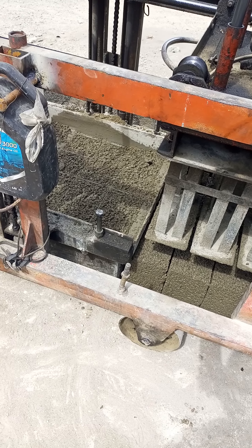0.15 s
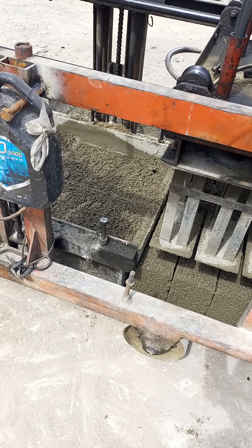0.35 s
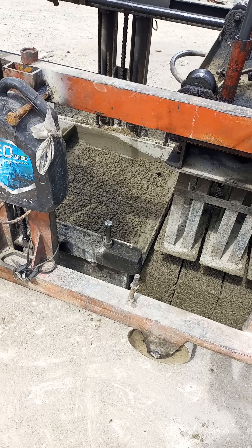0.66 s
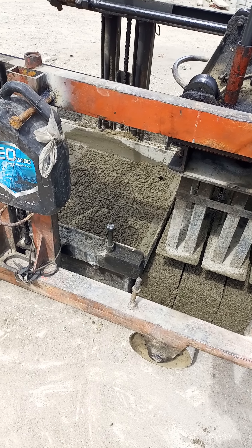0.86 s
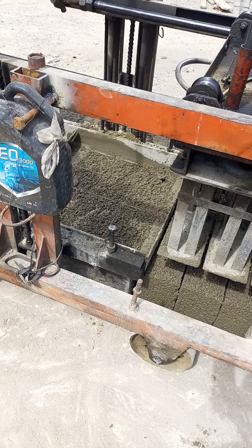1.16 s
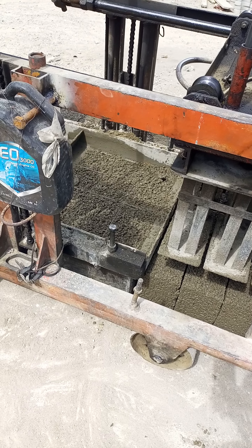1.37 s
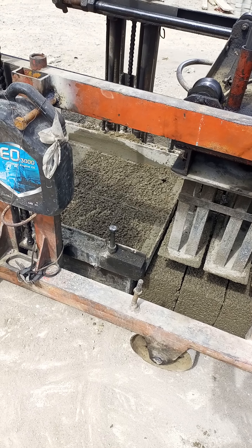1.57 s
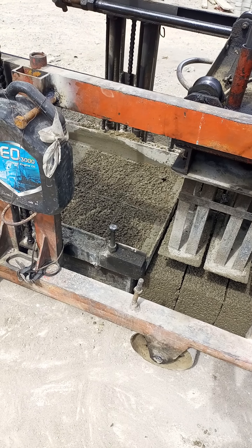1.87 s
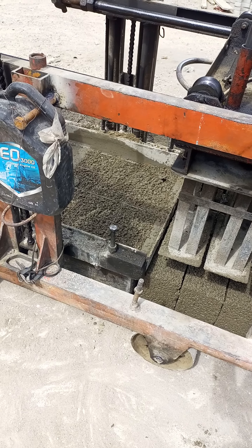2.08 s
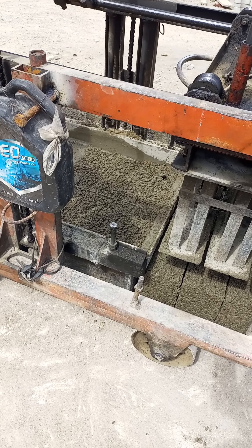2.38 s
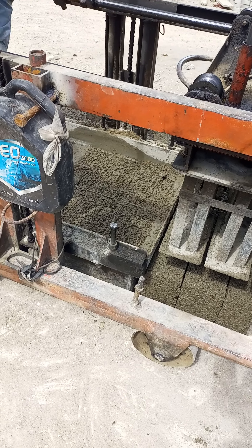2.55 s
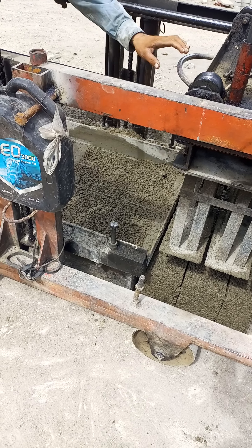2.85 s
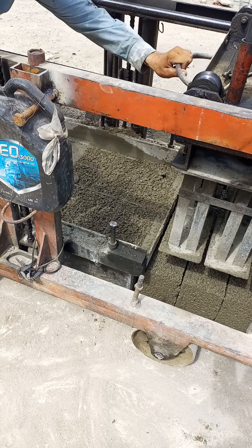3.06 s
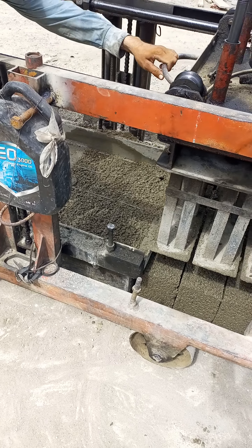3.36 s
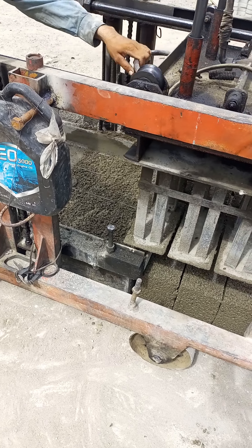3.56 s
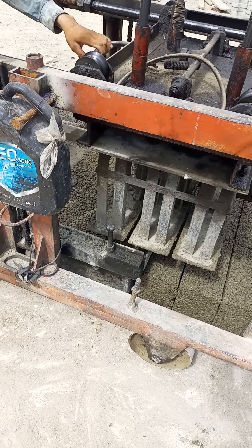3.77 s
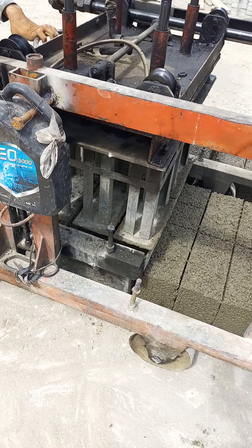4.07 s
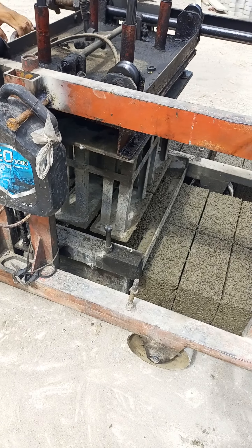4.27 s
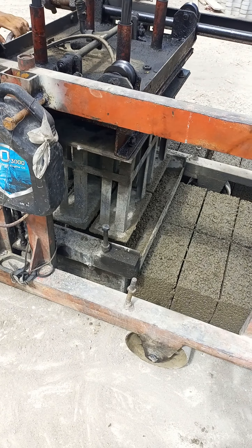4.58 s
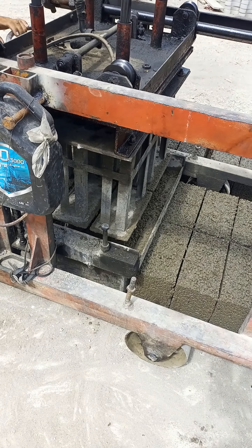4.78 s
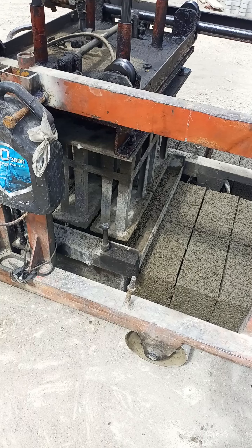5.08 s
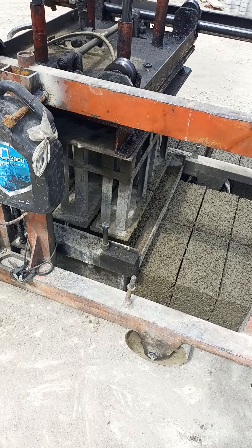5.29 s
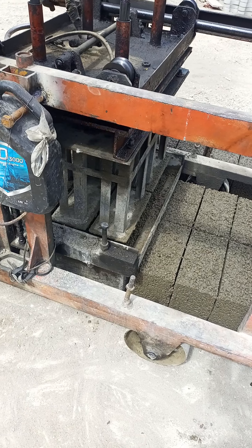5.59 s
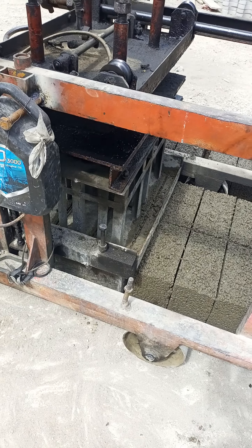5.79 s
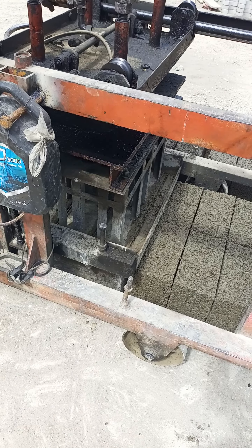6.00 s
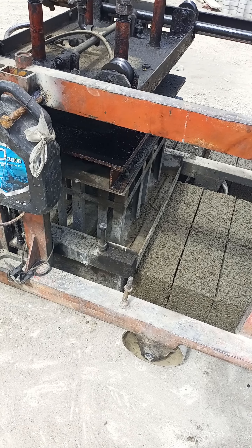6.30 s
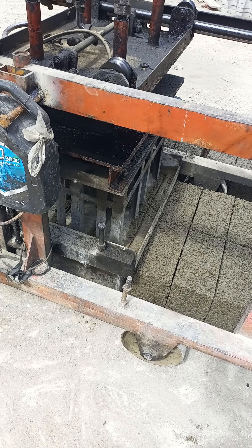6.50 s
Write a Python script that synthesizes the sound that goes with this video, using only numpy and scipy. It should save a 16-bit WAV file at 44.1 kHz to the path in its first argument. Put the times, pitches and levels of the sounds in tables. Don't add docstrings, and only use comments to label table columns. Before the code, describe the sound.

Outdoors, close to a block-making machine, a one-cylinder engine chugs slowly with ticking valves and loose covers. A shovel knocks and scrapes through wet, gritty mix against a steel mould, in scattered bursts with small clinks. After a pause of plain idling come a few more sharp knocks, then the engine picks up in quick cracks and the whole frame breaks into a dense, loud rattle with a low boom, still climbing at the end.

```python
import sys
import numpy as np
from scipy import signal
from scipy.io import wavfile
from scipy.ndimage import uniform_filter1d

SR = 44100
rng = np.random.default_rng(int(sys.argv[2]) if len(sys.argv) > 2 else 0)


def pcm_store(signal):
    levels = np.round(np.clip(np.atleast_2d(signal), -1, 1) * 32767)
    wavfile.write(sys.argv[1], SR, levels.astype(np.int16).T)


def elevation(decibels):
    levels = np.asarray(decibels, float)
    return 10 ** (levels / 20)


N = 292824
T = np.arange(N) / SR
THROTTLE_S = 4.82

# [t/s, firings per s]
SPEED = [(0, 11.6), (.8, 11.92), (1.4, 12.), (2.1, 11.46), (3., 11.82), (3.9, 11.79), (4.8, 11.63),
         (4.95, 16.52), (5.2, 18.65), (5.5, 23.07), (5.8, 25.62), (6.1, 31.36), (6.4, 36.22), (6.66, 41.6)]
# [t/s, level/dB]
LOAD = [
    (4.82, -33),
    (4.92, -42),
    (5.2, -33),
    (5.42, -24.5),
    (5.72, -22),
    (5.755, -19.5),
    (5.88, -23),
    (6.1, -23.5),
    (6.47, -20),
]
# [f/Hz, level/dB, t60/s, lag/s]
PIPE = [
    (105, 1.5, 0.11, 0.0051),
    (133, 1.5, 0.1, 0.0042),
    (229, 1.5, 0.058, 0.0005),
]
# [middle t/s, length/s, level/dB]
CHARGE = [(.25, .08, 4), (.33, .08, -8), (.63, .17, 1.5), (1.1, .08, 1), (1.18, .08, 6), (1.9, .17, 6),
          (2.46, .08, 10.5), (2.63, .25, 6.5), (2.92, .17, 2), (3.23, .25, 5.5), (3.65, .08, -10),
          (3.78, .17, 6), (3.91, .08, 3.5), (4.07, .25, -4), (5.04, .05, 8), (5.095, .05, 3.5),
          (5.15, .05, 1)]
# [share of cycle, level/dB, f/Hz, t60/s]
SLAPS = [(.40, -36.5, 2570, .11), (.47, -39, 2530, .09), (.02, -40, 2200, .05), (.03, -43, 3580, .06),
         (.60, -45, 1350, .08), (.40, -44, 4270, .05), (.3, -46, 5200, .04), (.33, -42, 3330, .05)]
# [share of cycle, level/dB]
STROKE = [(0, -8), (.03, 0), (.1, -1), (.22, -4.5), (.34, -1), (.46, -.5), (.56, -4), (.62, -3.5),
          (.72, -9), (.82, -12), (1, -10)]
# [f/Hz, level/dB per Hz]
CASING = [(150, -5.5), (250, -17.5), (324, -22), (555, -11.5), (828, -19), (1150, -9), (1740, -9.5),
          (2560, -0.5), (2740, -5.5), (3810, -10), (4300, -10.5), (7240, -25.5), (9300, -17), (10500, -13),
          (10950, -24.5), (13500, -27.5), (15800, -22.5)]
# [f/Hz, width/Hz, level/dB]
COVER_MODES = [(1105, 15, -51), (1405, 56, -9.5), (1444, 46, -7.5), (2117, 15, -4.5), (2274, 33, -3.5),
               (2646, 73, -12), (2690, 93, -14), (3150, 35, -8), (3390, 56, -5.5), (3583, 25, -6),
               (4310, 45, -6), (4600, 71, -13), (4650, 28, -13), (5230, 46, -12), (5450, 48, -20),
               (5940, 61, -16)]
# [f/Hz, level/dB per Hz]
YARD = [(20, -2), (60, -5), (110, -3), (160, -6), (250, -9), (330, -11), (550, -5), (780, -11), (1300, -7),
        (2500, -40)]
# [t/s, level/dB, f/Hz, t60/s]
RINGS = [(.15, -38, 412, 0.064), (0.539, -18, 980, 0.039), (0.543, -25, 453, 0.042), (.7, -44, 805, 0.45),
         (1.29, -43, 525, 0.19), (1.385, -39.5, 818, 0.2), (1.432, -36.5, 805, 0.21),
         (.539, -20, 2380, .05), (.79, -23.5, 226, 0.25), (.72, -40.5, 440, .3), (.85, -35, 480, .3),
         (5.19, -25, 232, .08), (4.357, -25, 4150, .1), (5.995, -27, 550, .5), (6.26, -29, 560, 0.7),
         (1.593, -20, 569, 0.12), (1.604, -41.5, 430, 2.1), (2.61, -39.5, 431, 4.7),
         (2.61, -19.5, 570, 0.074), (2.743, -43.5, 437, 0.47), (2.745, -33.5, 540, 0.19),
         (2.894, -31.5, 570, 0.066), (2.899, -46.5, 436, 3), (2.221, -32.5, 101, 0.54),
         (4.302, -21.5, 238.2, 0.24), (4.59, -47.5, 1600, 0.37), (5.04, -40, 444, 0.28),
         (5.105, -43, 440, 0.22), (5.15, -40, 570, 0.1), (5.265, -33, 403, .2), (4.845, -35, 2200, .08),
         (4.865, -32, 2600, .1), (4.855, -37, 5200, .08), (4.965, -33, 2150, .07), (4.99, -34, 3350, .08),
         (5.02, -37, 5950, .1), (5.12, -36, 1350, .15), (5.17, -33, 1400, .1), (2.405, -35, 2600, .08),
         (3.345, -42, 4750, .12), (1.7, -39, 4300, .1), (5.755, -17, 690, 0.13), (5.754, -28, 236, 0.34)]
# [t/s, level at 2.4 kHz/dB, weight/dB, breadth/dB, t60/s]
KNOCKS = [(0.539, -10, -14.5, -11, 0.061), (0.5551, -22.5, 0.5, 3.5, 0.066),
          (0.7894, -20.5, -33, -18, 0.08), (1.2209, -28, -15, 7, 0.058), (1.8825, -13.5, -10, -30, 0.14),
          (1.9078, -5, -13, -3.5, 0.047), (2.2069, -34.5, 22.5, 2, 0.24), (2.2498, -43.5, -6, 28, 0.14),
          (2.297, -20.5, -8, 2, 0.11), (2.3182, -17.5, -21, 1, 0.083), (2.6075, -17.5, -26, -2, 0.061),
          (2.743, -20.5, -11, -13.5, 0.15), (2.8897, -17, -40, -42, 0.14), (2.9194, -31, -13, -7, 0.052),
          (4.3006, -14, -32, -10, 0.12), (4.3289, -12.5, -43, -5.5, 0.084), (4.357, -18.5, -31, -2, 0.27),
          (4.428, -12.5, -48, -9, 0.093), (4.83, -26.5, -44, -14, 0.13), (5.7584, -4, -6.5, -29, 0.074)]
BLADE_HZ = [345, 560, 680, 790, 877, 1030, 1168, 1280, 1480, 1626, 1740, 1960, 2150, 2260, 2400, 2580, 2724,
            2955, 3060, 3320, 3620, 4320, 4600, 4926, 5286, 5920, 6340, 7120]
# [start t/s, length/s, gravel on mould/dB, drag of blade/dB, grit/dB]
SCRAPES = [(0.693, 0.14, -55, -44.5, -45), (0.78, 0.085, -32.5, -41, -37), (0.81, 0.061, -31, -33.5, -54),
           (0.846, 0.11, -49, -45, -51), (1.22, 0.12, -50, -42, -38), (1.494, 0.11, -33.5, -39.5, -41),
           (1.553, 0.073, -37.5, -33.5, -45), (1.875, 0.045, -52, -25, -25.5),
           (1.913, 0.12, -54, -34.5, -33), (2.195, 0.16, -26, -29, -42), (2.251, 0.073, -25.5, -27.5, -33),
           (2.296, 0.13, -32.5, -29.5, -33.5), (2.395, 0.097, -42, -57, -60), (2.6, 0.13, -44, -37.5, -42),
           (4.261, .04, -60, -56, -39), (4.281, 0.16, -35.5, -32, -22.5), (4.421, 0.06, -38, -36, -32.5)]
# [low f/Hz, high f/Hz]
STROKE_BANDS = [
    (130, 345),
    (350, 926),
    (1500, 3550),
    (4000, 7140),
]
# [f/Hz, level/dB per Hz]
SPRAY = [(7000, -52), (8500, 9), (10200, 10), (13000, -8), (15600, 9), (16000, -20)]
# [start t/s, length/s, level/dB]
THROWS = [
    (0.783, 0.024, -31.5),
    (2.197, 0.063, -33.5),
    (2.24, 0.031, -32.5),
    (2.29, 0.046, -25),
    (4.822, 0.025, -37),
]
# [f/Hz, level/dB, t60/s]
EDGE = [(364, -12, 0.16), (800, -13, 0.14), (1273, -13, 0.11), (1487, 8, 0.028), (1600, -13, 0.063),
        (2140, 4.5, 0.037), (2260, -9, .08), (2474, 1, 0.057), (4040, -10, 0.065), (4860, -4, 0.073),
        (5210, 13.5, 0.021), (4970, -4, 0.14), (6300, -7, 0.05)]
# [f/Hz, level/dB, t60/s]
RIM = [(880, -13.5, 0.27), (1360, -23, 0.35), (1540, -14, 0.38), (2054, -9, 0.23), (2240, -8, 0.1),
       (2680, 10.5, 0.042), (3070, -4, 0.077), (3650, -10, 0.083), (4160, -2.5, 0.037), (4320, -2, 0.06),
       (5300, -11, 0.063), (5700, -11, 0.042), (5860, -29, .12)]
# [t/s, level/dB]
EDGE_HITS = [
    (1.221, -24),
    (1.879, -43),
]
# [t/s, level/dB]
RIM_HITS = [
    (2.608, -21),
    (2.616, -24),
    (2.741, -25),
    (2.891, -37),
    (2.92, -38),
]
# [delay/s, level/dB]
ECHOES = [(.0031, -19), (.0074, -17), (0.012, -14), (0.021, -40), (.034, -17.5)]
# [f/Hz, level/dB per Hz]
RATTLE = [(600, -41), (1200, -42), (1630, -32), (1900, -8), (2600, -6), (3200, -2), (3700, 0), (4200, 1.5),
          (5400, 0.5), (6200, 3), (7600, -7), (9800, -15.5), (12300, -20), (13600, -23), (15700, -3)]
# [f/Hz, width/Hz, level/dB]
FRAME_MODES = [(1155, 60, -9), (1260, 70, -9), (1875, 50, -4), (2058, 60, -6), (2209, 60, -5),
               (2430, 60, -4), (2559, 55, -1), (2665, 55, -3), (2848, 65, -2), (3219, 60, -1),
               (3330, 70, -3), (3985, 70, -4), (4262, 80, -4), (4758, 60, -7), (4927, 50, -6),
               (5200, 70, -8), (5706, 60, -7), (6164, 110, -3), (6890, 100, -12), (9020, 120, -17)]
# [f/Hz, width/Hz, level/dB]
BOLTS = [(7920, 190, 2), (8630, 45, -3), (9080, 130, 0.5), (9820, 180, 3.5), (10750, 180, 1),
         (11540, 62, 0)]
# [f/Hz, width/Hz, level/dB]
PANELS = [(2890, 77, 0), (3240, 60, 2), (3340, 44, -2), (3880, 90, -9), (4030, 55, -1), (4070, 70, -5),
          (4880, 50, -6), (6120, 47, -8), (6200, 60, -6), (6950, 66, -2)]
# [f/Hz, level/dB per Hz]
BOOM = [(30, -22), (70, -8), (130, -7), (220, 1), (300, -8), (550, -4.5), (760, -3), (1200, -8), (1700, -5),
        (2400, -39)]
# [level as the belt grips/dB, level at full speed/dB]
ORDERS = [(-14, -9), (-7, -1), (4, -6), (-1, -1), (-5, -2), (-5, -2), (-5, -3), (-7, -8), (-10, -3),
          (-9, -8), (-11, -7), (-12, -9)]
# [t/s, level/dB]
CRACKS = [(4.8407, -21), (4.913, -21.5), (4.9744, -17.5), (5.0328, -20.5), (5.089, -22), (5.1434, -20.5),
          (5.1981, -21), (5.2505, -16.5), (5.302, -21.5), (5.3522, -18), (5.3991, -15.5), (5.4435, -20)]
# [f/Hz, level/dB per Hz]
CRACK_COLOUR = [(2000, -52), (4000, -23), (5800, 22), (7600, 9.5), (9800, 20.5), (11000, 10), (12200, 14),
                (14000, 18), (15600, 26), (16500, -10)]
# [multiple, level/dB]
GROWL = [(3, -16), (4, -10), (5, -4.5), (6, -2.5), (7, -5), (8, -15), (9, -6), (10, 2.5), (11, -10),
         (12, 1), (13, 2), (14, -5), (15, 1), (16, -2.5), (17, -2.5), (18, 0), (19, -5), (20, -10),
         (21, -14), (22, -6)]
# [f/Hz, level/dB]
GROWL_COLOUR = [(60, -18), (150, 7), (200, 3), (245, -4), (290, -9.5), (390, -6), (550, -3.5), (700, -15.5),
                (1200, -6)]


def evened(x):
    return x / np.sqrt(np.mean(x ** 2) + 1e-20)


def along(points, at, column=1):
    table = np.array(points, float)
    return np.interp(at, table[:, 0], table[:, column])


def add(mix, s, sound):
    part = mix[max(round(s * SR), 0):][:len(sound)]
    part += sound[:len(part)]


def coloured(x, points, peaks=(), lift_db=0.):
    hz = np.abs(np.fft.fftfreq(8192, 1 / SR))
    f, db = np.transpose(points)
    gain = elevation(np.interp(np.log(hz + 1), np.log(f + 1), db, left=-90, right=-90))
    resonances = sum(1 / np.hypot(1, 2 * (hz - p) / w) for p, w, _ in peaks)
    log = np.log(gain * (1 + elevation(lift_db) * resonances) + 1e-5)
    taps = np.fft.ifft(np.exp(log - 1j * signal.hilbert(log).imag)).real[:4096]
    return evened(signal.oaconvolve(x, taps)[:len(x)])


def band(x, lo_hz, hi_hz):
    return signal.sosfilt(signal.butter(2, [lo_hz, hi_hz], "band", fs=SR, output="sos"), x)


def slow_noise(width):
    return evened(uniform_filter1d(rng.standard_normal(N), width))


def grains(count, per_s, spread_db):
    out, many = np.zeros(count), int(count * per_s / SR) + 1
    size_db = spread_db * np.minimum(rng.exponential(1, many), 4)
    out[rng.integers(0, count, many)] = elevation(size_db) * rng.standard_normal(many)
    return evened(out)


def dying(hz, t60, t):
    return np.sin(2 * np.pi * hz * t) * elevation(-60 * t / t60)


def rung(peaks, gate, per_s, spread_db, loose_db):
    out, at = np.zeros(N), np.arange(0, N / SR + 1, .07)
    for hz, width, db in peaks:
        r = np.exp(-np.pi * np.clip(width, 30, 120) / SR)
        wander_db = loose_db * np.interp(T, at, rng.standard_normal(400)[:len(at)])
        drive = gate * grains(N, per_s, spread_db) * elevation(wander_db)
        resonator = [1, -2 * r * np.cos(2 * np.pi * hz / SR), r * r]
        out += elevation(db) * evened(signal.lfilter([1], resonator, drive))
    return evened(out)


def wavering(turns, multiples, levels_db, span, depth_db):
    drifts = evened(uniform_filter1d(rng.standard_normal((N // 500 + 2, len(multiples))), span, axis=0))
    lines = np.zeros(N)
    for k, db, drift in zip(multiples, levels_db, drifts.T):
        drift_db = depth_db * np.interp(np.arange(N) / 500, np.arange(len(drift)), drift)
        lines += elevation(db + drift_db) * np.cos(2 * np.pi * (k * turns + drift[0]))
    return lines


def cycles():
    return -.92 + np.cumsum(along(SPEED, T)) / SR


def firings(share, uneven_db):
    whole = np.floor(cycles() - share).astype(int) + 3
    return np.diff(whole, prepend=whole[0]) * elevation(uneven_db * rng.standard_normal(120))[whole]


def exhaust():
    t, idle = T[:6000], T < THROTTLE_S
    valve = -np.minimum(t / 0.0023, 1) * np.clip((.03 - t) / 0.0049, .08, 1)
    modes = [np.roll(valve * elevation(db) * dying(hz, t60, t), round(lag * SR)) for hz, db, t60, lag in PIPE]

    faster = along(SPEED, T) - along(SPEED, THROTTLE_S)
    charge_db = sum(db * (abs(T - s) < length / 2) for s, length, db in CHARGE)
    strength_db = np.where(idle, -43, -27.5 - 0.47 * faster) + charge_db
    blows = np.roll(firings(0, 0.88) * elevation(strength_db - 4.5), -60)

    puff_lag = round(.03 * SR)
    puffs = np.roll(blows * elevation(3.0 * rng.standard_normal(N)), puff_lag)
    puffs = elevation(-7.5 - 4 * ~idle) * puffs
    upper = np.where(idle, firings(0, 2.1) + 1e-9, .22)
    tone = np.maximum(np.roll(upper, -60), np.roll(upper, puff_lag - 60))
    drives = (blows + puffs, tone * (blows + puffs), tone * blows)
    return sum(signal.oaconvolve(drive, mode) for drive, mode in zip(drives, modes))[:N]


def valve_tick():
    hiss = coloured(rng.standard_normal(N), CRACK_COLOUR, BOLTS, 9.)
    return hiss * signal.oaconvolve(firings(.32, 3.) * elevation(-53), np.exp(-T[:6000] / 0.0032))[:N]


def slaps():
    t, out = T[:4000], np.zeros(N)
    for share, db, hz, t60 in SLAPS:
        mode = elevation(db) * dying(hz, t60, t) * np.minimum(t / 0.009, 1)
        out += signal.oaconvolve(firings(share, 2.6) * (T < THROTTLE_S), mode)[:N]
    return out


def casing():
    stroke_db = along(STROKE, cycles() % 1)
    drive = elevation(.8 * stroke_db + slow_noise(400)) * rng.standard_normal(N)
    steady = .5
    drive = drive - (1 - steady) * band(drive, 7500, 16000)
    drive = drive + steady * elevation(-4) * band(rng.standard_normal(N), 7500, 16000)
    covers = rung(COVER_MODES, elevation(1.5 * stroke_db), 200, 2.5, 3.)
    level = np.hypot(elevation(-43.5), elevation(-5 + along(LOAD, T)))
    return level * (0.45 * coloured(drive, CASING) + 0.35 * covers)


def yard():
    return elevation(-63) * coloured(rng.standard_normal(N), YARD)


def ring(s, db, hz, t60):
    t = T[:20000]
    noise = uniform_filter1d(rng.standard_normal(len(t)), 450)
    wobble = 1 + .33 * evened(uniform_filter1d(noise, 250))
    fade = np.minimum(t / 0.0057, 1) * np.clip((.2 - t) / 0.073, 0, 1)
    return s, elevation(db) * wobble * dying(hz * (1 - 0.043 * t), t60, t) * fade


def knock(s, db, low_db, wide_db, t60):
    t = T[:7000]
    colour = [(120, low_db - 65), (350, low_db + 19), (950, wide_db + 7.0), (2400, 0), (5300, wide_db - 5.0),
              (7800, wide_db - 10.5), (9000, wide_db - 7), (15800, wide_db - 22)]
    luck = rng.standard_normal((len(BLADE_HZ), 2)) * [4.5, 1]
    tilt_db = 3 * np.log2(np.array(BLADE_HZ) / 2400)
    modes = sum(elevation(along(colour, hz) + tilt + a) * dying(hz * (1 + 0.0135 * b), 0.73 * t60, t)
                for hz, tilt, (a, b) in zip(BLADE_HZ, tilt_db, luck))
    grit = coloured(rng.standard_normal(len(t)), colour) * elevation(-60 * t / t60)
    return s, elevation(db - 11.5) * (0.57 * modes + 0.53 * grit) * np.minimum(t / 0.00093, 1)


def scrape(start, length, gravel_db, drag_db, grit_db):
    t = np.arange(0, length, 1 / SR)
    jolts = grains(len(t), 1100, 2.) + .65 * rng.standard_normal(len(t))
    jolts = coloured(jolts, [(20, 0), (20000, 0)], FRAME_MODES, 8.)
    fizz_db = grit_db - 4.5
    levels_db = (gravel_db, drag_db, grit_db, fizz_db)
    parts = sum(elevation(db - 4.0) * evened(band(band(jolts, *hz), *hz)) for db, hz in zip(levels_db, STROKE_BANDS))
    parts = parts + 0.095 * elevation(fizz_db) * coloured(jolts, SPRAY)
    hold = 0.45
    lift = np.clip((t / length - hold) / (1 - hold), 0, 1)
    return start, parts * np.minimum(t / 0.015, 1) * elevation(-18 * lift) * np.sqrt(1 - lift)


def throw(start, length, db):
    t = np.arange(0, 2 * length, 1 / SR)
    grit = grains(len(t), 2500, 2.3) + rng.standard_normal(len(t))
    grit = coloured(grit, [(20, 0), (20000, 0)], FRAME_MODES + BOLTS, 12.)
    hiss = evened(band(band(grit, 3700, 7000), 3700, 7000)) + 0.32 * coloured(grit, SPRAY)
    return start, elevation(db - 19 * (t / length) ** 2) * hiss * np.minimum(t / 0.0072, 1)


def clink(modes, db):
    t = T[:9000]
    luck_db = 1.8 * rng.standard_normal(len(modes))
    struck = sum(elevation(d + a) * dying(hz, t60, t) for (hz, d, t60), a in zip(modes, luck_db))
    return elevation(db) * struck * np.minimum(t / 0.0019, 1)


def frame_rattle(pulse):
    shaken = 0.38 * rng.standard_normal(N) + 0.5 * grains(N, 2200, 3.2)
    rattle = .5 * np.clip(1 - 1.8 * (5.3 - T), .3, 1) * coloured(pulse * shaken, RATTLE)
    rattle = rattle + .9 * rung(FRAME_MODES, pulse, 500, 3., 2.5)
    rattle = rattle + elevation(-17.5) * rung(BOLTS, pulse, 500, 2.5, 3.)
    panels_in = np.clip((T - 6.05) / .3, 0, 1)
    rattle = rattle + elevation(-4) * panels_in * rung(PANELS, pulse, 500, 3., 3.3)
    still = (1 - .15) * np.clip(1 - (T - 5.08) / .15, 0, 1)
    return rattle - still * (band(rattle, 500, 1150) + band(rattle, 1620, 2050))


def frame():
    speed, load_db = along(SPEED, T), along(LOAD, T)
    turns = np.cumsum(speed * (2.67 - .3 * np.maximum(T - 6.36, 0))) / SR
    throb_db = 1.1 * (along(STROKE, cycles() % 1) + 4) * np.clip((5.3 - T) / 0.47, 0, 1)
    pulse = elevation(throb_db + 1.8 * np.cos(2 * np.pi * turns) + 0.34 * slow_noise(300))
    rattle = frame_rattle(pulse)

    grip_s, slack_from_s = 5.19, 4.95
    slack = elevation(-8 * np.clip((grip_s - T) / .03 + .5, 0, 1))
    slack = slack * np.clip((T - slack_from_s) / (grip_s - slack_from_s), 0, 1)
    boom = coloured(pulse * rng.standard_normal(N), BOOM)
    deep = band(boom, 105, 340)
    spread = np.clip((T - 5.09) / 0.26, 0, 1)
    boom = slack * deep * elevation(-11 * (T > 6.08)) + (boom - deep) * spread

    grown = np.clip((T - 5.75) / .75, 0, 1)
    orders_db = [early_db + (late_db - early_db) * grown for early_db, late_db in ORDERS]
    orders = slack * wavering(turns, range(1, len(ORDERS) + 1), orders_db, 9, 1.8)

    low = elevation(-14 + 0.76 * load_db - 0.15 * (speed - 23)) * boom + elevation(-24.5 + 0.43 * load_db) * orders
    return np.clip((T - THROTTLE_S) / 0.046, 0, 1) * (elevation(load_db) * rattle + low)


def exhaust_crack():
    t = T[:6000]
    burst = np.exp(-((t - .004) / 0.0024) ** 2) + 0.32 * np.exp(-t / 0.012) * np.minimum(t / 0.003, 1)
    faster = along(SPEED, T) - along(SPEED, THROTTLE_S)
    level_db = -15.5 + 0.23 * along(LOAD, T) - .5 * faster
    late = np.roll(firings(0, 3.5), -110) * (T > 5.46) * elevation(level_db)
    crack = signal.oaconvolve(late, burst)[:N]
    for s, db in CRACKS:
        add(crack, s - .002, elevation(db - 8) * burst)
    return crack * coloured(rng.standard_normal(N), CRACK_COLOUR, BOLTS, 9.)


def growl():
    speed = along(SPEED, T)
    levels_db = [db + .5 * along(GROWL_COLOUR, k * speed) for k, db in GROWL]
    lines = wavering(cycles(), [k for k, _ in GROWL], levels_db, 11, 2.5)
    return elevation(-30 + 0.57 * along(LOAD, T)) * np.clip((T - 5.0) / 0.3, 0, 1) * lines


def echoed(tools):
    taps = np.zeros(2000)
    taps[0] = 1
    for s, db in ECHOES:
        taps[round(s * SR)] = elevation(db)
    return signal.oaconvolve(tools, taps)[:N]


def scene():
    tools = np.zeros(N)
    for source, events in ((ring, RINGS), (knock, KNOCKS), (scrape, SCRAPES), (throw, THROWS)):
        for event in events:
            add(tools, *source(*event))
    for modes, hits in ((EDGE, EDGE_HITS), (RIM, RIM_HITS)):
        for s, db in hits:
            add(tools, s, clink(modes, db))
    engine = exhaust() + valve_tick() + slaps() + casing() + exhaust_crack() + growl()
    return (engine + echoed(tools) + frame() + yard())[None]


def roll_off(x):
    return signal.sosfilt(signal.butter(12, 17000, fs=SR, output="sos"), x)


def record(dry):
    thin = signal.sosfilt(signal.butter(3, 80, "high", fs=SR, output="sos"), dry)
    edge = signal.firwin(301, 15850, window=("kaiser", 6), fs=SR)
    return roll_off(signal.oaconvolve(thin, edge[None], "same"))


dry = scene()
out = record(dry)
pcm_store(out)
```